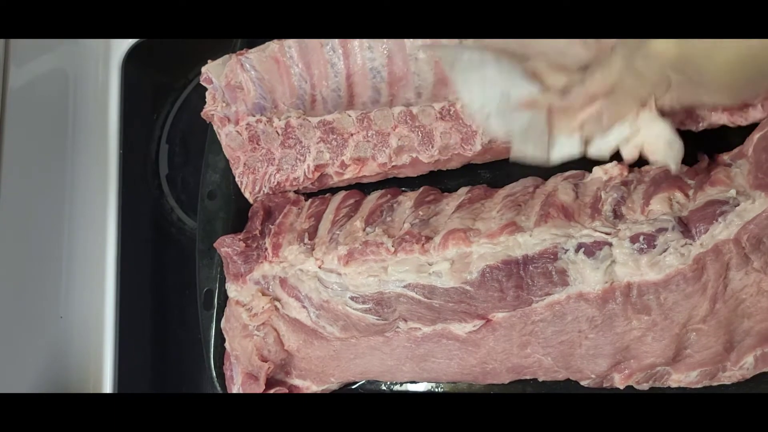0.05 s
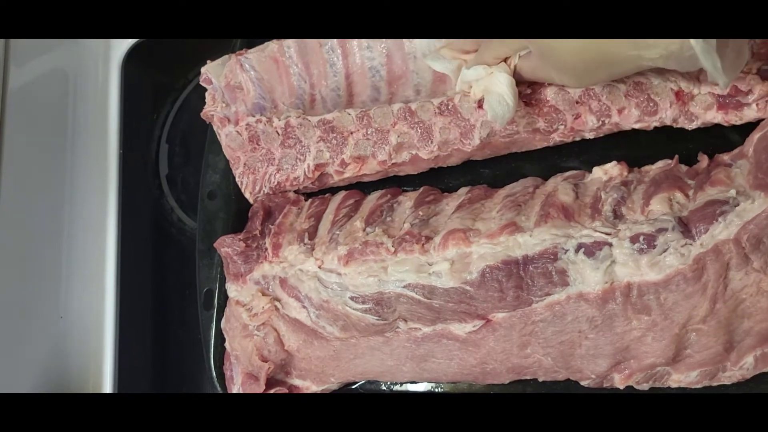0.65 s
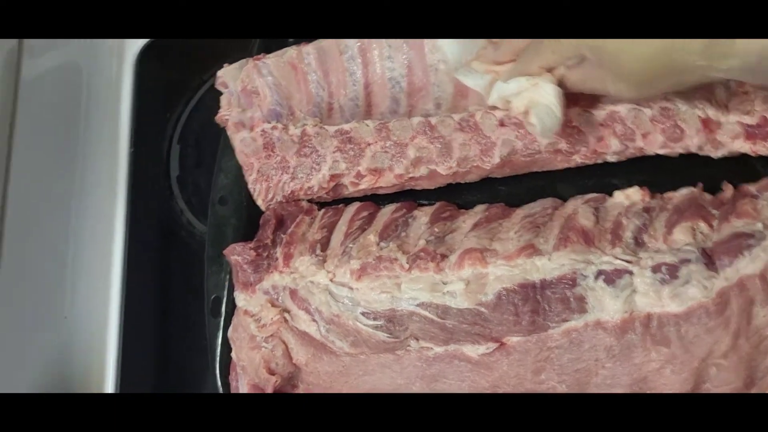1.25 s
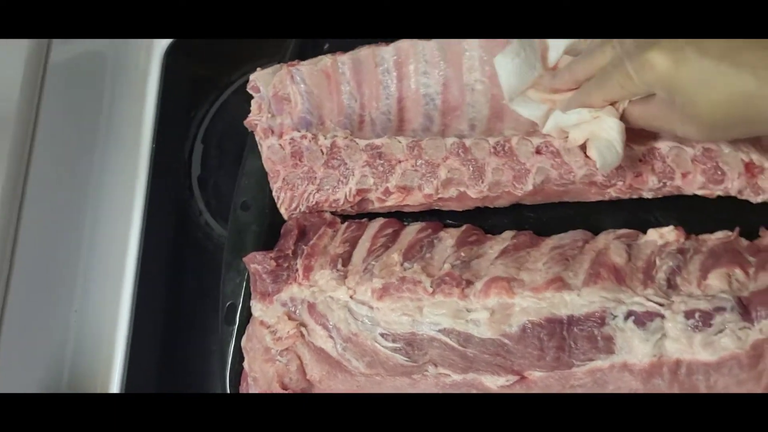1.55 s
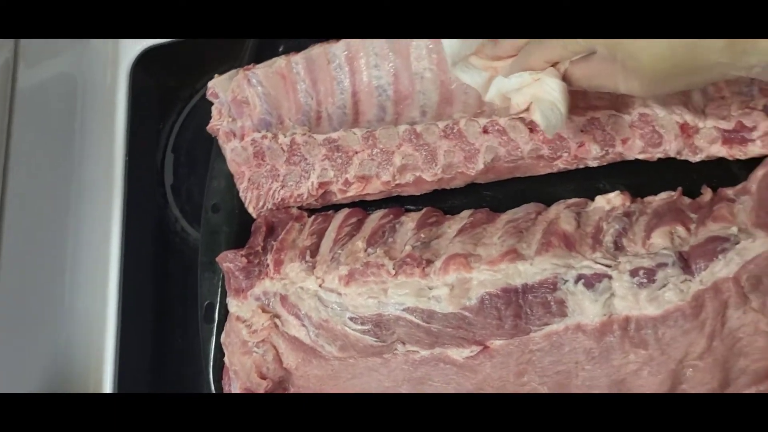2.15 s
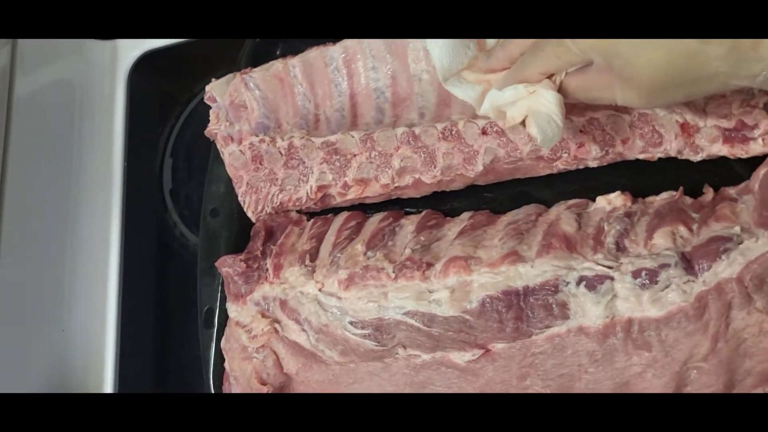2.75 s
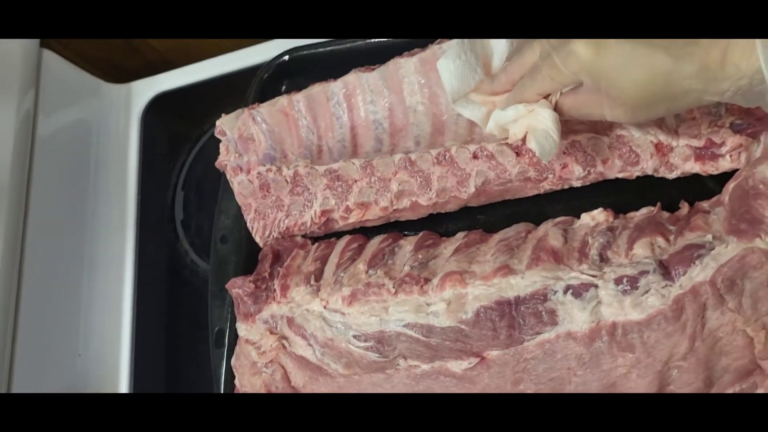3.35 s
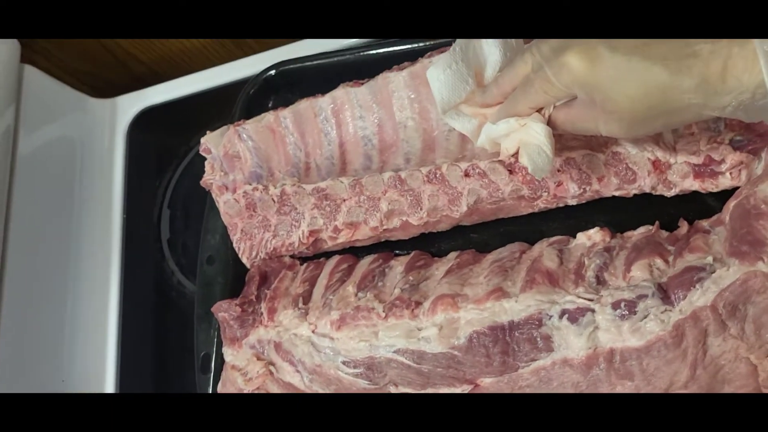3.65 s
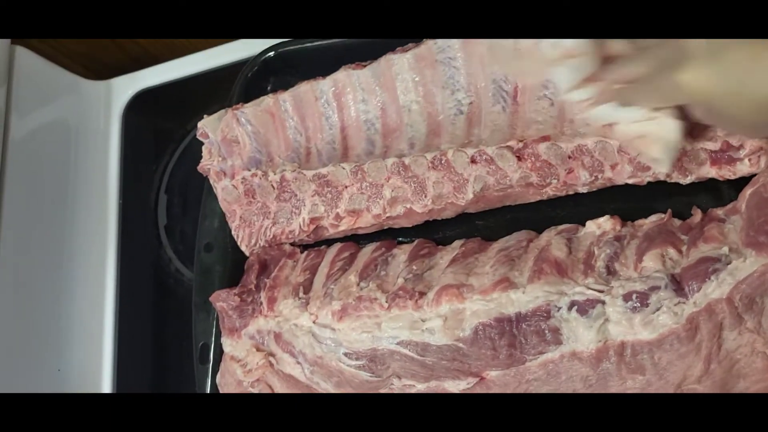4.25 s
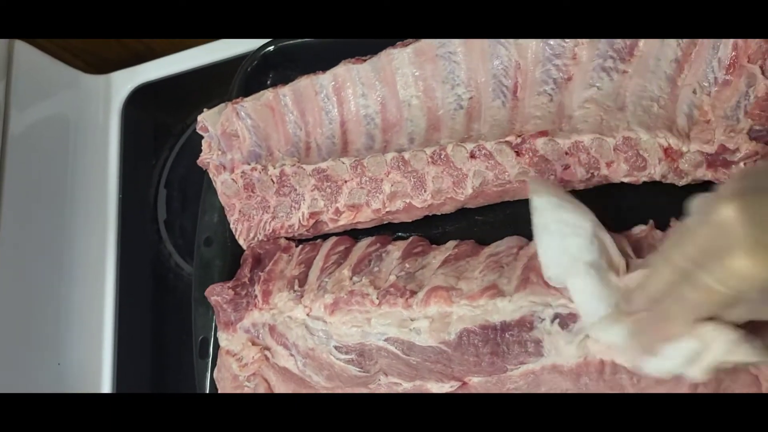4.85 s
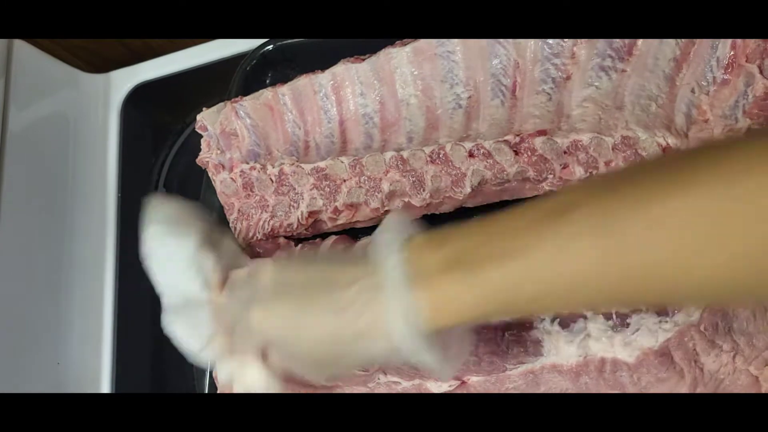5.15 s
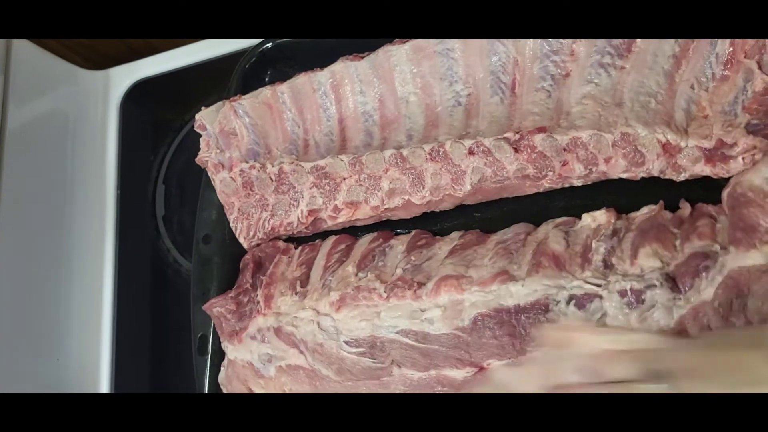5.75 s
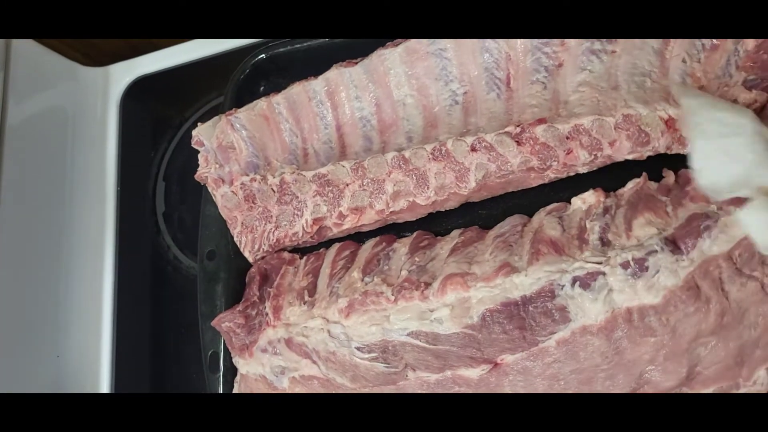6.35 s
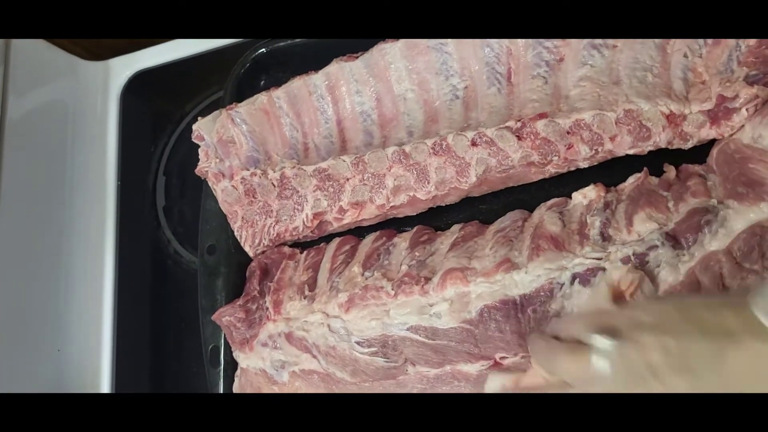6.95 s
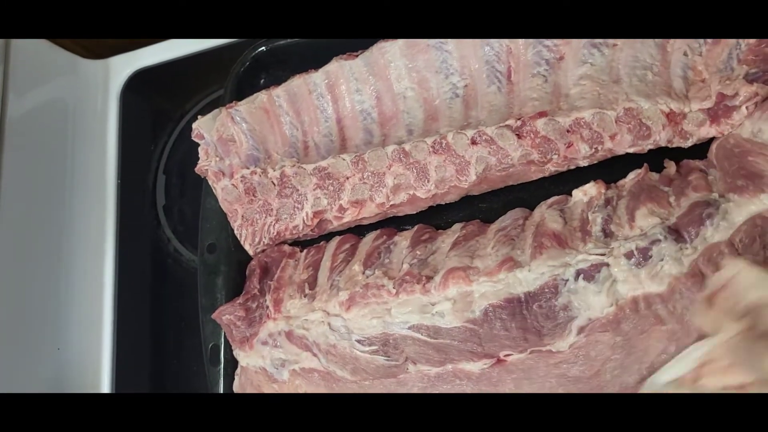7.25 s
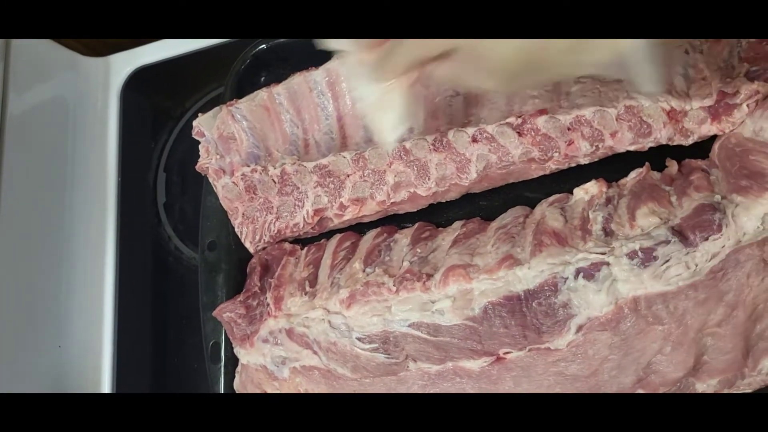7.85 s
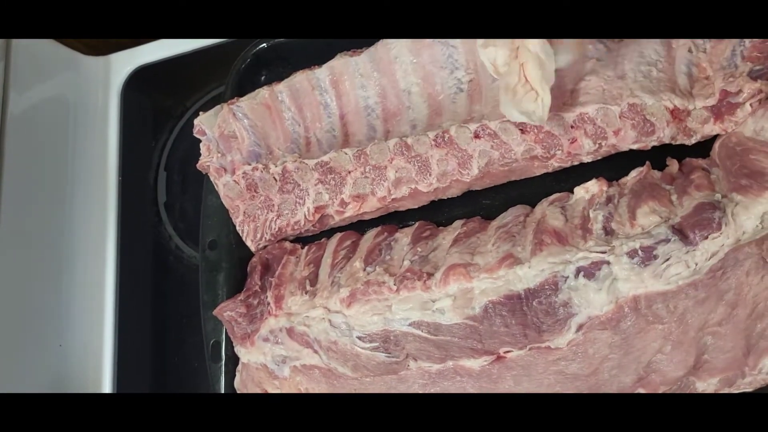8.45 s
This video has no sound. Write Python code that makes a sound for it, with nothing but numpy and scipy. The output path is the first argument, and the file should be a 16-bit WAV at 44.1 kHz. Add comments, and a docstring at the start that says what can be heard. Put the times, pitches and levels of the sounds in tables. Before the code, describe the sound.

A wad of paper towel wipes lightly over raw ribs, close to the microphone, with soft rustling and small crinkles over the faint steady noise of a small kitchen. From about 0.7 to 4.4 seconds, fingers scrape and bump on the device beside the microphone, on the right, in jerky patches, while the towel keeps rubbing gently. From about 4.8 seconds come wet dabs, slightly to the left: the flesh smacks and thuds dully in its pan, hardest at 5.3 seconds. Longer rasping strokes of paper begin at about 5.9 seconds, with a drawn-out one between 6.6 and 7 seconds, and scattered moist pats and soft thuds among them. Just after 8 seconds comes the firmest wipe, rustling and rubbing amid several more low thuds, and it eases off at around 8.5 seconds.

```python
"""Small quiet kitchen, a phone's two microphones held close to raw ribs in a roasting pan.
A gloved hand starts wiping lightly with a wad of paper towel: fibres catch on the meat, creases snap.
From 0.7 to 4.4 s the other hand's fingers scrape and bump on the case, beside the right microphone.
Then come the dabs, a little to the left: wet flesh smacks and thuds on the pan, hardest at 5.3 s.
Long rasping strokes follow from 5.9 s, and the firmest wipe ends it among more thuds after 8 s."""
import sys
import numpy as np
from scipy import signal
from scipy.fft import rfft, irfft
from scipy.io import wavfile
from scipy.ndimage import uniform_filter1d

SR = 44100
rng = np.random.default_rng(int(sys.argv[2]) if len(sys.argv) > 2 else 0)


def output_pcm(signal):
    """Save a mono or channel-first signal as 16-bit PCM at the path in sys.argv[1].

    Samples are clipped to [-1, 1] before scaling.
    """
    pcm = np.clip(np.atleast_2d(signal).T, -1, 1) * 32767
    wavfile.write(sys.argv[1], SR, np.round(pcm).astype(np.int16))


N = 375034
TIME = np.arange(N) / SR
FREQ = np.maximum(np.arange(N // 2 + 1) * SR / N, 1)

# Levels in the tables are relative, ahead of the mix gains.
# room tone: f/Hz, level/dB
ROOM_SPECTRUM = [(20, 16), (60, 21), (130, 21.5), (220, 14), (330, 14), (550, -1), (1200, -1), (3000, -40),
                 (8000, -2.5), (15000, -3.5)]
# colour of the microphone ports: f/Hz, gain/dB
MIC_RESPONSE = [(5500, -0.5), (7000, -0.5), (8000, 0.5), (9200, -6.5), (11300, -10.5), (13500, -7),
                (15500, -10)]
# fingers sliding on the phone case: t/s, rise/s, hold/s, rumble/dB, scrape/dB, hiss/dB
FINGER_SLIDES = [(.708, 0.0053, 0.044, -28, -34.5, -44.5), (.78, 0.0093, .006, -31, -41, -53),
                 (.825, .015, 0.023, -34, -44.5, -51.5), (.88, 0.0048, 0.02, -30.5, -44, -49),
                 (.915, 0.032, 0.026, -49, -47, -58.5), (1.33, 0.041, 0.027, -51, -61, -60.5),
                 (1.42, 0.025, 0.028, -41.5, -69, -59), (2.44, 0.023, 0.033, -45, -56, -54.5),
                 (2.48, 0.086, 0.023, -42.5, -46, -46), (2.6, 0.056, 0.039, -31.5, -39.5, -45.5),
                 (2.712, 0.03, 0.034, -37, -46, -52), (2.84, 0.008, 0.12, -43, -49.5, -57.5),
                 (2.98, 0.018, 0.068, -53, -45.5, -58), (3.095, 0.0067, 0.062, -41, -49, -54.5),
                 (3.19, 0.045, 0.051, -51, -54, -62), (3.89, 0.034, 0.06, -41, -49.5, -55.5),
                 (4.0, 0.022, 0.069, -59, -53.5, -58)]
# the three bands of a slide: f/Hz, level/dB
CASE_RUMBLE_SPECTRUM = [(20, -50), (42, -3.5), (72, 0), (110, -0.5), (190, -7.5), (300, -11), (600, -55),
                        (1500, -75)]
CASE_SCRAPE_SPECTRUM = [(80, -46), (200, -7), (380, 2.5), (700, 0.5), (1200, -12.5), (1800, -13),
                        (3500, -20.5), (9000, -33)]
CASE_HISS_SPECTRUM = [(800, -2), (2500, 12), (5000, 10), (8000, 12.5), (15000, 15.5)]
# fingertips bumping and juddering on the case: t/s, level/dB, decay/s
FINGER_BUMPS = [(1.426, -26.5, 0.0085), (2.476, -37, 0.015), (2.924, -36.5, 0.1), (3.002, -33, 0.023),
                (3.043, -26.5, 0.016), (3.385, -39, 0.022), (3.683, -40, .011), (3.777, -37, 0.014),
                (3.949, -31.5, 0.016), (4.179, -44, 0.038), (4.354, -22.5, .018)]
# fingers catching on the case: t/s, level/dB, f/Hz, width/octaves, decay/s
FINGER_CATCHES = [(.7135, -37, 900, 6.8, 0.044), (.752, -31, 328, 2, 0.018), (.899, -26, 400, 0.64, 0.0031),
                  (1.385, -43.5, 213, 0.17, 0.021), (2.646, -39.5, 3550, 0.34, .026),
                  (2.665, -29.5, 224, 1.1, .033), (2.853, -41.5, 990, 1.1, 0.017),
                  (2.935, -50, 1110, 1.3, 0.06), (3.008, -52, 1090, .63, 0.14),
                  (3.103, -45.5, 1120, 1.2, 0.016), (3.158, -44, 930, 0.52, 0.0063),
                  (3.379, -42, 740, 0.97, 0.0046), (3.932, -53, 1150, 0.72, 0.0054),
                  (3.949, -38.5, 179, 0.81, 0.011)]
# the slab thudding in the pan: t/s, level/dB, f/Hz, decay/s
SLAB_THUDS = [(4.77, -42, 120, .0087), (5.2745, -13, 158, 0.0061), (5.332, -37.5, 100, 0.023),
              (6.088, -39.5, 135, 0.013), (6.128, -42, 170, 0.016), (7.298, -40.5, 87, 0.0073),
              (7.664, -48, 198, 0.02), (7.738, -36.5, 76, 0.012), (7.978, -24.5, 70.6, 0.01),
              (8.029, -23, 153, .011), (8.052, -25, 124, 0.0059), (8.254, -31.5, 102.5, 0.032)]
# the slab rumbling under the hand: f/Hz, level/dB
SLAB_SPECTRUM = [(20, -23), (45, 7), (75, 3), (150, -2), (260, -13), (500, -14.5), (1200, -31)]
# wet dabs on the meat, with a lone tap among them at 2.4 s: t/s, spatter/dB, f/Hz, width/octaves, decay/s,
# squelch/dB
WET_SMACKS = [(0.9667, -38, 1600, 1.7, 0.0024, -53), (1.185, -66, 600, 1.2, 0.0072, -62),
              (1.9, -68, 600, 1.1, 0.013, -68.5), (2.3995, -49.5, 885, 1.3, 0.0063, -59),
              (4.81, -44.5, 800, 2.1, 0.011, -48), (4.826, -36, 1270, 0.61, 0.008, -39),
              (4.872, -41, 630, 1, 0.0041, -44), (4.923, -45, 930, 2.9, 0.01, -41),
              (4.976, -47, 1000, 1.1, 0.0029, -66), (5.2708, -28.5, 1900, 1.05, 0.002, -55),
              (5.274, -33, 1000, 2.1, 0.0072, -40), (5.4028, -32, 1380, 1.24, 0.0038, -54),
              (5.490, -48.5, 1250, 1.6, 0.016, -54.5), (5.691, -39.5, 1900, 0.43, 0.0076, -46),
              (6.007, -48, 1050, 1.7, 0.032, -49.5), (6.297, -51.5, 790, 2.4, 0.035, -58.5),
              (6.975, -47.5, 563, 0.72, 0.029, -52), (7.212, -48.5, 595, 1.9, 0.02, -61),
              (7.6625, -35, 1690, 1.46, 0.0084, -49), (8.0281, -33, 1390, 4.9, .0056, -52)]
# air pockets popping in the wet film: t/s, level/dB, f/Hz
FILM_POPS = [(4.828, -41, 2480), (5.404, -45, 1150), (5.701, -46.5, 4630)]
# resonances of the hollow between meat and pan: f/Hz, width/Hz, gain/dB
HOLLOW_MODES = [(340, 180, 3), (1180, 150, 4), (1400, 120, 3), (1680, 180, 4)]
# strokes of the towel: t/s, rise/s, hold/s, rub/dB, rustle/dB, rumble/dB
TOWEL_STROKES = [(0.0, 0.008, .04, -73, -54, -83), (.11, 0.085, 0.035, -79, -58, -83),
                 (.34, 0.13, 0.043, -62, -53, -65), (.49, 0.072, 0.023, -51, -56.5, -70),
                 (.655, 0.026, 0.015, -53, -54, -53), (.71, .012, 0.2, -53.5, -59, -52.5),
                 (1.03, 0.016, 0.28, -72.5, -64.5, -63), (1.28, 0.14, 0.08, -59, -64, -79),
                 (1.82, 0.066, 0.017, -69, -77, -76), (2.06, 0.22, 0.2, -62.5, -66, -83),
                 (2.43, 0.089, 0.043, -51, -57.5, -58), (2.63, 0.031, 0.15, -53.5, -56, -53.5),
                 (2.86, .04, 0.25, -62.5, -93, -62), (3.16, 0.055, .2, -71, -92, -61),
                 (3.888, 0.042, 0.053, -55.5, -58, -58), (4.06, 0.063, 0.15, -56.5, -54.5, -56.5),
                 (4.32, 0.014, 0.055, -58, -54, -55.5), (4.42, 0.017, 0.17, -74, -62, -66),
                 (4.7, 0.048, 0.016, -51.5, -50.5, -52), (4.8, 0.068, 0.073, -61, -55.5, -53),
                 (5.18, 0.075, 0.036, -67, -54.5, -66), (5.255, 0.014, 0.13, -68, -58, -47),
                 (5.46, 0.063, 0.087, -64.5, -59.5, -58.5), (5.64, 0.014, 0.2, -62, -58.5, -70),
                 (5.86, 0.083, 0.17, -53.5, -51, -73), (6.2, .05, 0.035, -66, -51.5, -58.5),
                 (6.35, 0.016, 0.27, -71, -60.5, -86), (6.57, 0.074, 0.4, -49.5, -49.5, -76),
                 (6.92, 0.032, 0.033, -51, -64, -58), (7.1, 0.023, 0.049, -59, -55.5, -81),
                 (7.2, .025, 0.042, -56, -54, -62.5), (7.46, 0.03, 0.011, -79, -53.5, -80),
                 (7.55, 0.022, 0.056, -75, -55, -70), (7.89, 0.06, 0.0075, -62, -52.5, -79),
                 (7.935, 0.048, 0.037, -52.5, -51, -55), (8.09, 0.19, 0.074, -46, -44, -52.5),
                 (8.28, 0.1, 0.021, -45, -42, -51), (8.44, 0.017, .06, -52.5, -55, -59)]
# long strokes where the ribbed paper rasps: t/s, rise/s, hold/s, level/dB
RASP_STROKES = [(5.89, 0.034, 0.079, -57.5), (6.58, 0.17, 0.22, -53), (8.18, 0.085, 0.046, -58)]
# creases snapping: t/s, level/dB, decay/s
CREASE_SNAPS = [(.016, -62, .006), (.096, -40.5, 0.0016), (.325, -51.5, 0.021), (.556, -44.5, 0.009),
                (0.827, -41.5, .008), (1.248, -61, .005), (1.998, -65, .005), (2.714, -36, 0.033),
                (3.157, -55, .005), (3.341, -56, 0.0027), (3.7126, -58, .003), (3.837, -61, .003),
                (3.89, -51, 0.0036), (4.133, -40, .008), (4.692, -49, 0.012), (4.741, -46, .009),
                (5.271, -36, 0.0061), (7.239, -40, 0.011), (7.561, -49, .008), (8.027, -39, .005)]
# fibres on the meat, and the dry paper: f/Hz, level/dB
RUB_SPECTRUM = [(100, -16), (260, -11), (370, 1.5), (650, -1.5), (800, 1), (1050, -2), (1250, 1.5),
                (1700, 0.5), (2600, -1.5), (4500, -7), (9000, -20)]
RUSTLE_SPECTRUM = [(600, -30), (1800, -6), (3000, -2), (4500, 1.5), (6500, 1.5), (9000, 3), (15000, 3)]
# bands coloured by pockets in the wad: f/Hz
POCKET_HZ = [600, 1300, 2600, 5200]


def amp(db):
    """Decibels to gain."""
    return 10 ** (np.asarray(db) / 20)


def unit(x):
    """Scale to rms 1."""
    return x / np.sqrt(np.mean(x ** 2))


def colour(x, spectrum):
    """Filter by points of f/Hz, gain/dB."""
    hz, db = np.transpose(spectrum)
    return irfft(rfft(x) * amp(np.interp(np.log(FREQ), np.log(hz), db)), N)


def pan(db):
    """Microphone gains for a left minus right level."""
    return amp(np.array([[db], [-db]]) / 2)


def band(x, hz, width_hz):
    """Resonance with gain 1 at its centre."""
    return signal.lfilter(*signal.iirpeak(hz, hz / width_hz, fs=SR), x)


def add(track, s, sound):
    """Mix a sound in at s seconds."""
    i = int(s * SR)
    track[..., i:i + sound.shape[-1]] += sound[..., :N - i]


def flutter(rate, depth_db):
    """Random gain that changes rate times a second."""
    hold = int(SR / rate)
    steps = np.repeat(rng.standard_normal(N // hold + 1), hold)
    return amp(depth_db * uniform_filter1d(steps, hold)[:N])


def stick_slip(rate, spread_db):
    """Tiny friction clicks of unequal size, about rate a second."""
    clicks = (rng.random(N) < rate / SR) * rng.standard_normal(N)
    return clicks * amp(spread_db * np.clip(rng.standard_normal(N), -2, 2))


def gestures(table, release_s):
    """One gain curve per dB column: each gesture rises, holds and dies away; overlaps add in power."""
    power = np.zeros((len(table[0]) - 3, N))
    for start, rise, hold, *levels in table:
        t = TIME[:int((rise + hold + 6 * release_s) * SR)]
        shape = np.minimum(t / rise, 1) * np.exp(-np.maximum(t - rise - hold, 0) / release_s)
        add(power, start, np.outer(amp(levels), shape) ** 2)
    return np.sqrt(power)


def at_mics(draw, shared):
    """A wide source reaches the two microphones only partly alike, the left one slightly later."""
    common, left, right = draw(), draw(), draw()
    alike = np.array([np.roll(common, 11), common])
    return np.sqrt(shared) * alike + np.sqrt(1 - shared) * np.array([left, right])


def bursts(table):
    """Wet or sticky contacts: the touching area spreads fast, then a band of spatter dies away."""
    out, t = np.zeros((2, N)), TIME[:SR // 5]
    freq = np.maximum(np.arange(len(t) // 2 + 1) * SR / len(t), 1)
    for s, db, hz, octaves, decay in table:
        passband = 1 / (1 + np.abs(2 * np.log2(freq / hz) / octaves) ** 1.93)
        noise = at_mics(lambda: rng.standard_normal(len(t)), shared=0.28)
        envelope = (1 - np.exp(-t / (0.13 * decay))) * np.exp(-t / decay)
        burst = irfft(rfft(noise) * passband, len(t)) * envelope
        burst *= np.linalg.norm(envelope) / np.linalg.norm(burst, axis=1, keepdims=True)
        add(out, s, amp(db) * burst)
    return out


def knocks(table, rise_cycles):
    """Heavily damped low swings after a soft contact."""
    out, t = np.zeros(N), TIME[:SR // 3]
    for s, db, hz, decay in table:
        envelope = (1 - np.exp(-t * hz / rise_cycles)) * np.exp(-t / decay)
        add(out, s, amp(db) * np.sin(2 * np.pi * hz * t) * envelope)
    return out


def kitchen(x, room_db, t60):
    """Close direct sound and a short, darker room tail, different at each microphone."""
    t = TIME[:SR // 2]
    tail = signal.lfilter([1], [1, -.45], rng.standard_normal((2, len(t))))
    tail *= amp(-60 * t / t60) * (t > .004)
    tail /= np.linalg.norm(tail, axis=1, keepdims=True)
    return x + amp(room_db) * signal.fftconvolve(np.atleast_2d(x), tail, axes=1)[:, :N]


def room_tone():
    """All around: the quiet, steady noise of the kitchen."""
    noise = rng.standard_normal((2, N)) + 1.04 * rng.standard_normal(N)
    return pan(0.28) * amp(-69.5) * unit(colour(noise, ROOM_SPECTRUM))


def handling_noise():
    """Right at the right microphone: skin slips in jerks on the phone case and rings it."""
    rumble, scrape, hiss = gestures(FINGER_SLIDES, release_s=0.018)
    jerks = flutter(rate=82, depth_db=1.6)
    rumble *= unit(colour(stick_slip(rate=1500, spread_db=5.5), CASE_RUMBLE_SPECTRUM))
    scrape *= unit(colour(stick_slip(rate=4000, spread_db=3.5), CASE_SCRAPE_SPECTRUM))
    scrape += (amp(9) - 1) * band(scrape, hz=1200, width_hz=260)  # the case rings
    hiss *= unit(colour(stick_slip(rate=12000, spread_db=3.5), CASE_HISS_SPECTRUM))
    slips = amp(-3.4) * rumble + jerks * (amp(-4) * scrape + amp(6) * hiss)
    bump_hz = 76.7
    bumps = knocks([(s, db, bump_hz, decay) for s, db, decay in FINGER_BUMPS], rise_cycles=.3)
    case = slips + amp(1.5) * bumps + bursts(FINGER_CATCHES)[1]
    return case * amp([[-22], [0]])


def slab():
    """In the pan, a little left: the heavy meat thuds, and rumbles under each stroke of the hand."""
    _, _, weight = gestures(TOWEL_STROKES, release_s=0.071)
    weight = np.hypot(weight, amp(-78.5))  # floor under a resting hand
    noise = at_mics(lambda: rng.standard_normal(N), shared=0.79)
    rumble = weight * unit(colour(noise, SLAB_SPECTRUM))
    thuds = kitchen(knocks(SLAB_THUDS, rise_cycles=0.37), room_db=-11, t60=0.3)
    return pan(2) * (amp(-4) * thuds + amp(-1) * rumble)


def smacks():
    """A little left: wet flesh meets or peels off a surface and rings the hollow under the slab."""
    lag_s, squelch_hz, squelch_octaves, squelch_decay_s = .003, 330, 1.0, 0.016
    pop_octaves, pop_decay_s, echo_s = 0.25, 0.0051, .0145
    spatter = bursts([row[:-1] for row in WET_SMACKS])
    squelch = bursts([(s + lag_s, db, squelch_hz, squelch_octaves, squelch_decay_s)
                      for s, *_, db in WET_SMACKS])
    pops = bursts([(s, db, hz, pop_octaves, pop_decay_s) for s, db, hz in FILM_POPS])
    wet = spatter + squelch + pops
    wet += sum((amp(db) - 1) * band(wet, hz, width) for hz, width, db in HOLLOW_MODES)
    # one bounce off the nearest wall, left and right swapped
    wet += amp(-12.5) * np.roll(wet[::-1], int(echo_s * SR), axis=1)
    return pan(2.5) * amp(.5) * kitchen(wet, room_db=-11, t60=.4)


def pockets(x):
    """Pockets in the wad open and close, so its colour never stands still."""
    for hz in POCKET_HZ:
        x = x + (flutter(rate=10, depth_db=2.2) - 1) * band(x, hz, hz / 2)
    return x


def crinkles(rate, decay_s):
    """Small folds give way at random: a gain relative to the rustle."""
    kicks = (rng.random(N) < rate / SR) * rng.random(N)
    return amp(-1.5) * signal.lfilter([1], [1, -np.exp(-1 / (decay_s * SR))], kicks)


def creases():
    """Each crease gives way in a quick swell and dies off: a gain for the fibre noise."""
    snaps, t = np.zeros(N), TIME[:SR // 5]
    for s, db, decay in CREASE_SNAPS:
        add(snaps, s, amp(db) * (1 - np.exp(-t / (0.4 * decay))) * np.exp(-t / decay))
    return snaps


def dry_paper(rasp):
    """The dry part of the wad rustles and snaps, and its ribbed surface rasps in the long strokes."""
    _, rustle, _ = gestures(TOWEL_STROKES, release_s=0.057)
    _, settling, _ = gestures(TOWEL_STROKES, release_s=0.26)
    rustle = np.hypot(rustle, amp(-8.5) * settling)  # the wad goes on settling after a stroke
    rustle = np.hypot(rustle, amp(-78))  # floor under a resting hand
    rustle *= np.hypot(flutter(rate=90, depth_db=1.34), crinkles(rate=24, decay_s=.002))
    fibres = at_mics(lambda: stick_slip(rate=12000, spread_db=1.5), shared=0.032)
    paper = unit(colour(fibres, RUSTLE_SPECTRUM)) * np.hypot(amp(2.14) * rustle, amp(4.5) * creases())
    ridges = at_mics(lambda: stick_slip(rate=4500, spread_db=9.5), shared=0.15)
    for _ in range(2):
        ridges = band(ridges, hz=4400, width_hz=1500)
    return paper + rasp * unit(ridges)


def rubbing(rasp):
    """Fibres drag over the meat; the wall behind the stove sends it straight back and makes it hollow."""
    rub, _, _ = gestures(TOWEL_STROKES, release_s=0.037)
    rub = np.hypot(rub, amp(-80.5))  # floor under a resting hand
    fibres = at_mics(lambda: stick_slip(rate=9000, spread_db=3.5), shared=0.32)
    drag = rub * unit(colour(fibres, RUB_SPECTRUM)) * flutter(rate=70, depth_db=1.44)
    echo_s = .00327
    echo_gain = amp(-18) + amp(-9) * rasp / rasp.max()  # strongest in the long strokes
    return drag + echo_gain * np.roll(drag, int(echo_s * SR), axis=1)


def towel():
    """The wad, close up: rubbing a little to the left, dry paper a little to the right."""
    rasp = gestures(RASP_STROKES, release_s=0.12)
    drag = kitchen(pockets(rubbing(rasp)), room_db=-4.5, t60=0.19)
    paper = kitchen(pockets(dry_paper(rasp)), room_db=-11, t60=0.067)
    return pan(2.5) * amp(-3.21) * drag + pan(-2.3) * paper


def scene():
    """The kitchen as it reaches the two microphones."""
    return room_tone() + handling_noise() + slab() + smacks() + towel()


def record(dry):
    """The microphone ports colour the treble and the phone cuts the top."""
    top_hz = 15600
    lowpass = signal.ellip(10, .2, 70, top_hz, fs=SR, output="sos")
    return signal.sosfilt(lowpass, colour(dry, MIC_RESPONSE))


dry = scene()
out = record(dry)
output_pcm(out)
```